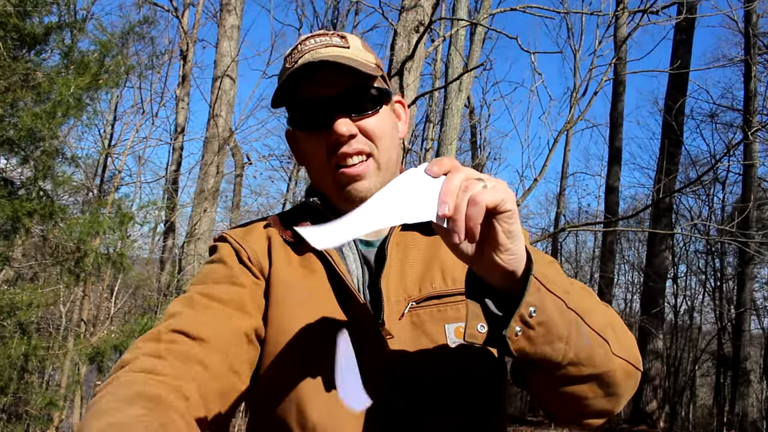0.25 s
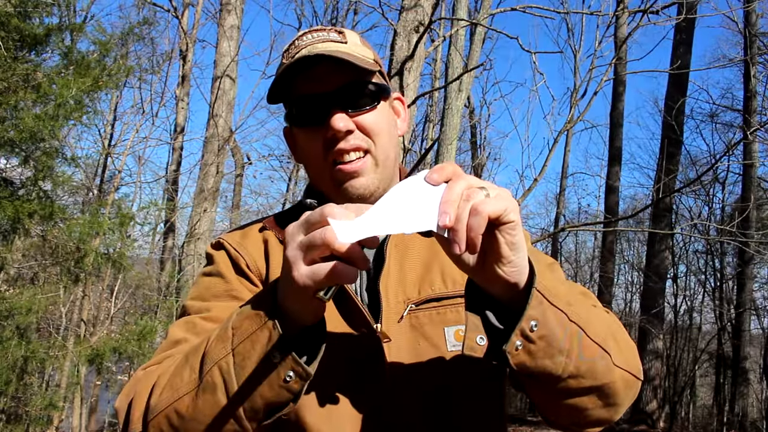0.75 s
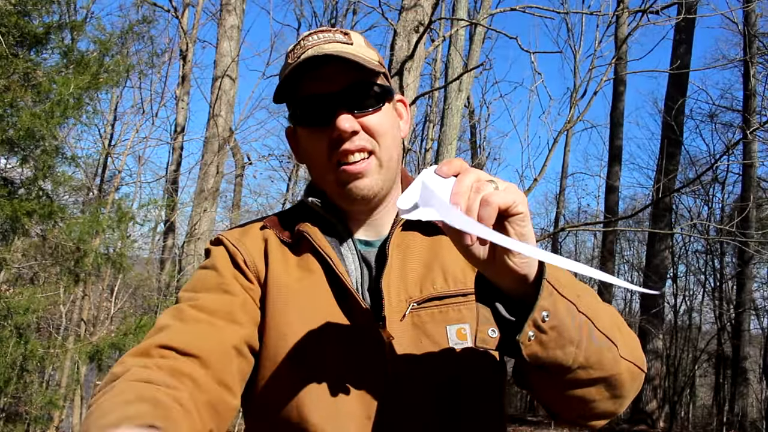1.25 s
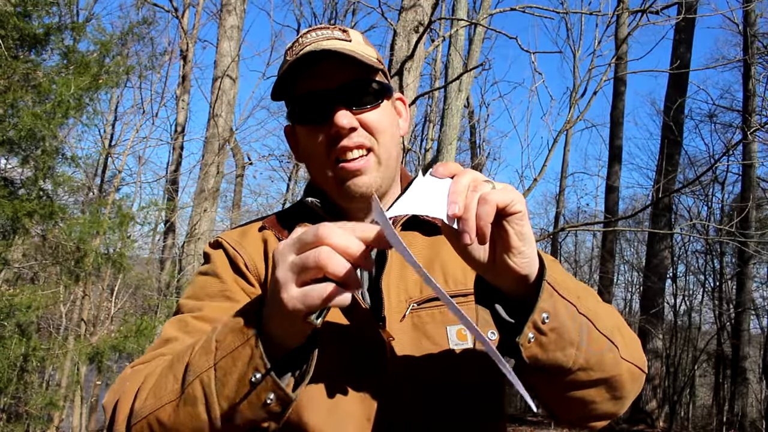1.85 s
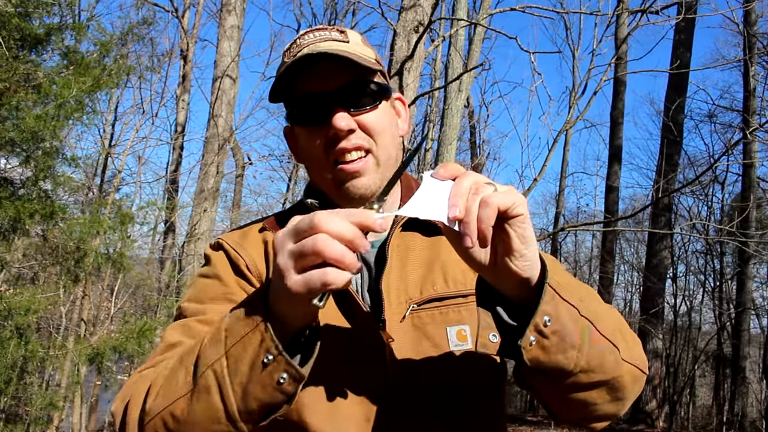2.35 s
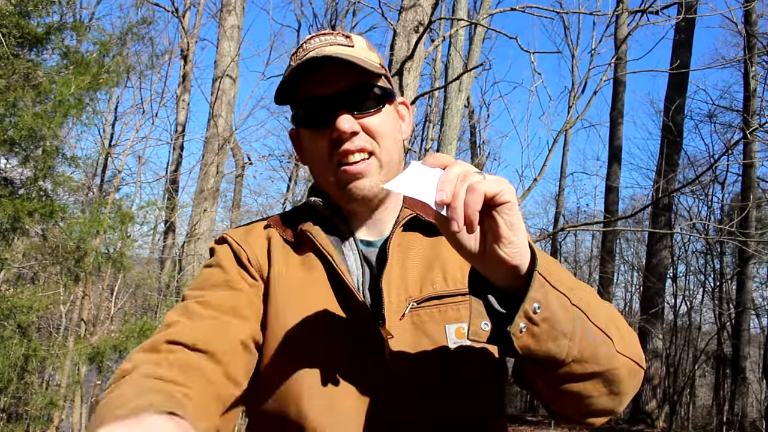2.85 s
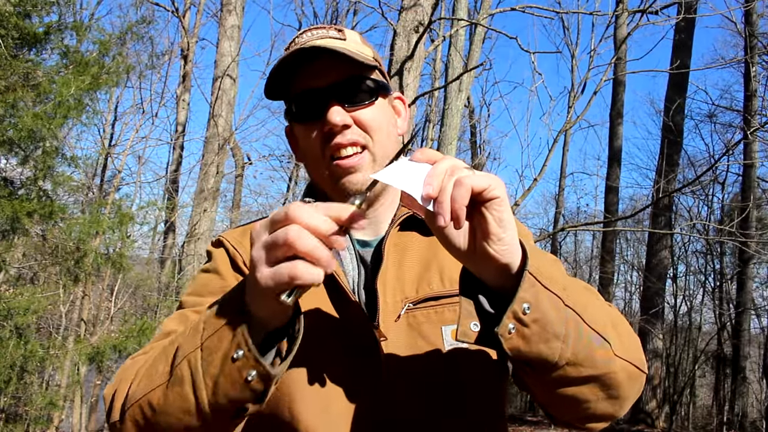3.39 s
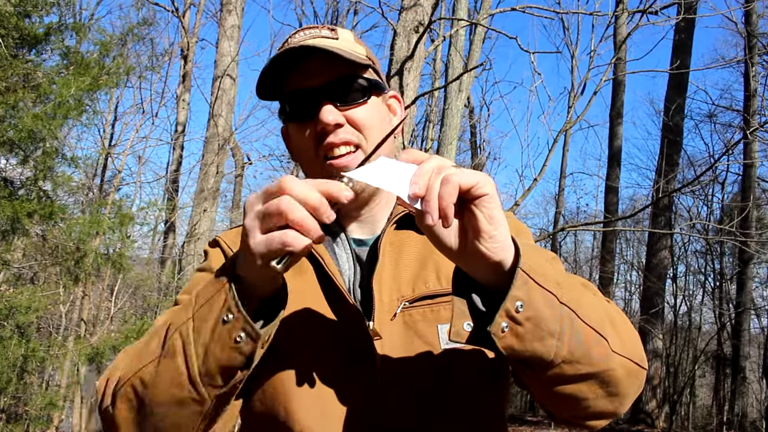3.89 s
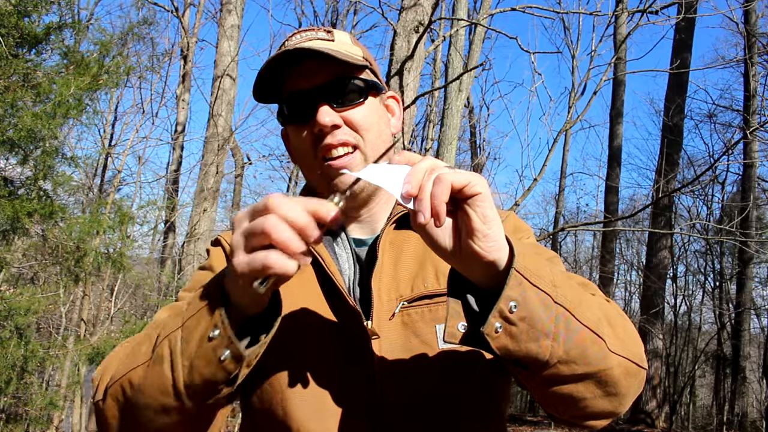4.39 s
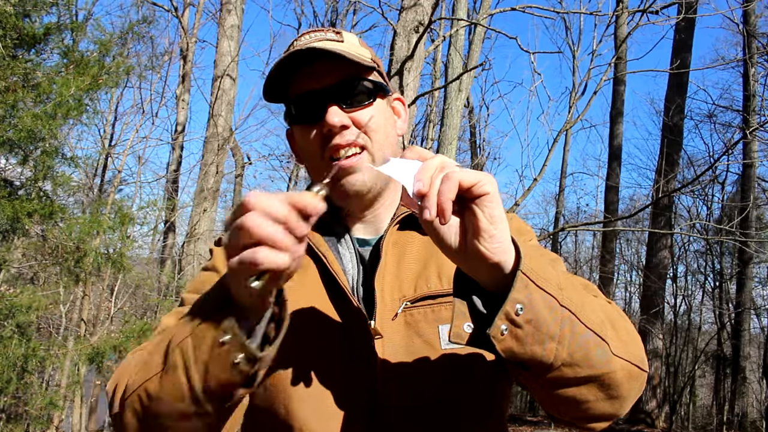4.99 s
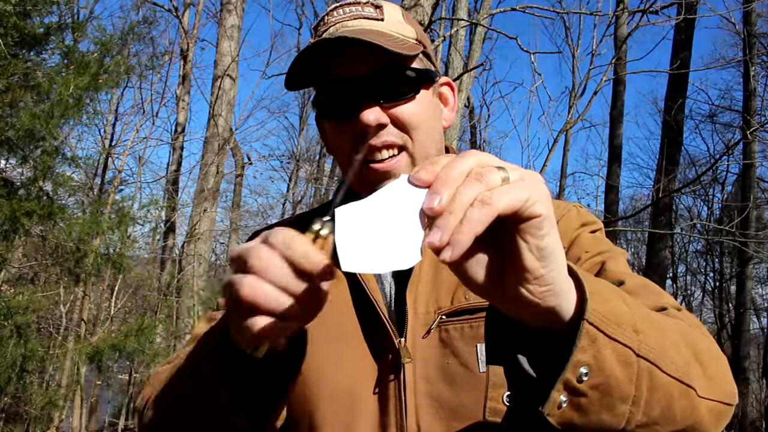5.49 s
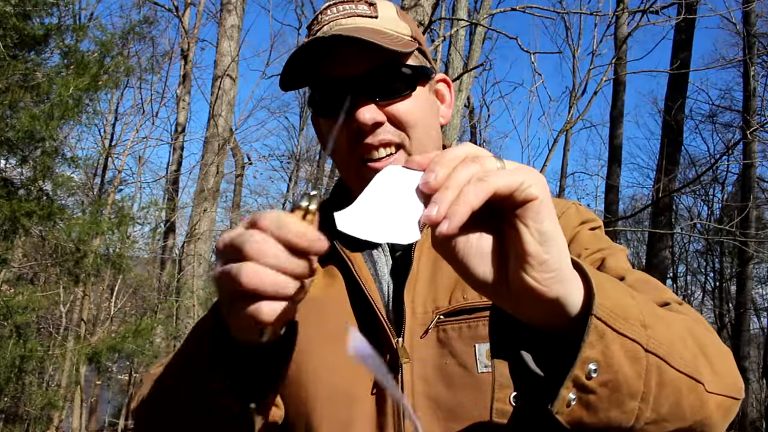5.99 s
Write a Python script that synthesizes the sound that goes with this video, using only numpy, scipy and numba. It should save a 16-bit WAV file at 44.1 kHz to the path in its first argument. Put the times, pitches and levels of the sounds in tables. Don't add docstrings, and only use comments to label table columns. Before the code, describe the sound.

Knife strokes tear crisply through paper close by, spaced out and then quickening into hard popping cuts, over faint breeze and woodland rumble.

```python
import sys
import numpy as np
from scipy import signal
from scipy.fft import rfft, irfft
from scipy.io import wavfile
from scipy.ndimage import uniform_filter1d
from numba import njit

SR = 44100
rng = np.random.default_rng(int(sys.argv[2]) if len(sys.argv) > 2 else 0)


def gain_from_db(level_db):
    decades = np.asarray(level_db, float) / 20
    return 10 ** decades


def put_to_file(sound):
    columns = np.atleast_2d(sound).T
    safe = np.clip(columns, -1, 1)
    whole_steps = np.round(safe * 32767)
    wavfile.write(sys.argv[1], SR, whole_steps.astype(np.int16))


N = 275184

# t/s, peak level/dB, low mode f/Hz, high mode f/Hz, thump level/dB
CHOP_BLOWS = [
    (5.158, -1, 1630, 3120, -37),
    (5.402, -0.5, 2810, 3200, -39),
    (5.639, 2.5, 2110, 2990, -42),
    (5.89, -1, 1840, 2840, -17.5),
    (6.136, -1, 1900, 3170, -11),
]


def unit(x):
    return x / np.sqrt(np.mean(x ** 2))


@njit
def svf(x, hz, q):
    y, b, l, k = np.empty(len(x)), 0., 0., 1 / q
    for i in range(len(x)):
        g = np.tan(np.pi * hz[i] / SR)
        v = (b + g * (x[i] - l)) / (1 + g * (g + k))
        b, l, y[i] = 2 * v - b, l + 2 * g * v, k * v
    return y


def band(x, hz, q):
    centre = np.clip(hz + np.zeros(len(x)), 20, .45 * SR)
    return svf(x, centre, float(q))


def ring(x, hz, q):
    return unit(band(band(x, hz, q), hz, q))


@njit
def follow(x, attack, release):
    y, e = np.empty(len(x)), 0.
    for i in range(len(x)):
        e += (x[i] - e) * (attack if x[i] > e else release)
        y[i] = e
    return y


def walk(rate):
    k = int(SR / rate)
    held = np.repeat(rng.standard_normal(N // k + 1), k)
    return 0.78 * uniform_filter1d(uniform_filter1d(held, k), k)[:N]


def add(out, t, x):
    i = int(t * SR)
    out[i:i + len(x)] += x[:len(out) - i]


def wood():
    # f/Hz, level/dB
    spectrum = [(100, -1), (170, 0), (690, -9), (1200, -15.5), (1700, -19.5), (2750, -20.5), (3270, -18),
                (3800, -24), (4300, -27), (5300, -32), (6400, -35), (9000, -38), (12000, -39.5),
                (16000, -41)]
    hz0, db0 = np.transpose(spectrum)
    hz = np.maximum(np.arange(N // 2 + 1) * SR / N, 1)
    colour = gain_from_db(np.interp(np.log(hz), np.log(hz0), db0)) * np.minimum(hz / hz0[0], 1) ** 2
    noise = rfft(rng.standard_normal(N)) * colour
    out, swell = 0, walk(0.16)
    for k in range(8):
        octave = np.clip(np.log2(hz / 125), 0, 7)
        share = np.clip(1 - np.abs(octave - k), 0, 1)
        out = out + gain_from_db(.5 * swell + .9 * walk(8)) * irfft(noise * share, N)
    return unit(out) * gain_from_db(-35)


def wind():
    # t/s, gust level/dB
    gusts = [(0.0, -24.5), (0.07, -26), (0.1, -35.5), (0.38, -28), (0.42, -36.5), (0.85, -27), (0.97, -32),
             (1.04, -28), (1.22, -51), (1.27, -39), (1.86, -35.5), (2.07, -58), (2.1, -39), (3.56, -48),
             (3.63, -33.5), (3.68, -36.5), (5.51, -53.5), (6.24, -49)]
    gust = np.interp(np.arange(N) / SR, *np.transpose(gusts)) + 35
    buffet = ring(rng.standard_normal(N), 70.3, 0.7) * gain_from_db(0.96 * walk(7.6))
    rumble = ring(rng.standard_normal(N), 148, 0.47) * gain_from_db(1.3 * walk(5.74))
    return buffet * gain_from_db(1.46 * gust - 36.0) + rumble * gain_from_db(0.21 * gust - 33 - 6.5)


def bird():
    # t/s, f/Hz, level/dB
    calls = [
        [(2.33, 8280, -70), (2.365, 7920, -65), (2.45, 7850, -67), (2.5, 7800, -71), (2.58, 7680, -68)],
        [(3.098, 5670, -58), (3.102, 5200, -41), (3.106, 4800, -58)],
    ]
    out = np.zeros(N)
    for call in calls:
        s, hz, db = np.transpose(call)
        t = np.arange(s[0], s[-1], 1 / SR)
        tone = np.sin(2 * np.pi * np.cumsum(np.interp(t, s, hz)) / SR)
        level = np.sqrt(2) * gain_from_db(np.interp(t, s, db))
        add(out, s[0], level * tone * signal.windows.tukey(len(t), .3))
    return out * gain_from_db(5.5 * walk(300) + 2.5 * walk(40))


def ticks():
    # t/s, mid peak level/dB, mid f/Hz, treble level/dB, pushed air level/dB
    tears = [
        (1.162, -0.5, 3500, 7, -20),
        (2.007, -6, 3680, -4, -24),
        (2.8213, -5, 2000, -2, -8),
        (3.501, -0.5, 3300, -25, -18),
        (3.516, -12.5, 3010, -2, -16),
        (4.0734, -1, 4060, -14, -12),
        (4.509, -2.5, 3400, 3.5, -14),
        (4.5192, -10, 3380, -10, -14),
        (4.8699, -1, 1560, 8, -16),
        (5.4228, 1, 2800, -2, -18),
    ]
    # t/s, mid peak level/dB, mid f/Hz, treble level/dB
    flaps = [(0.2348, -19, 1380, -40), (0.3724, -19.5, 1520, -24), (0.8949, -22, 1000, -15),
             (1.198, -21, 3120, -24), (1.2089, -15.5, 2810, -35), (1.2456, -21, 1340, -27),
             (1.7412, -15, 3300, -10), (2.667, -21, 3560, -8), (2.8616, -13.5, 1500, -35),
             (2.877, -22.5, 1310, -26), (3.5314, -20, 2170, -31), (4.5382, -11, 1550, -7),
             (4.905, -23, 3150, -8), (5.933, -18, 1550, -3), (5.957, -25, 1500, -30),
             (6.2036, -15, 3000, -22)]
    # t/s, mid peak level/dB, treble level/dB
    creases = [(0.2924, -40, 3), (1.5683, -26.5, -16), (1.681, -23.5, -11), (2.06, -30.5, -3),
               (2.5704, -35, 1), (2.5864, -29, -7), (2.603, -34, -17), (2.9294, -32, -30),
               (3.595, -26.5, -11), (3.639, -25.5, -11), (4.146, -25, -11), (4.1886, -33, -3),
               (4.2104, -30, -11), (4.5816, -27, -7), (4.624, -28.5, -7), (4.94, -28, 1), (4.9556, -26, -1),
               (5.775, -39.5, 3), (5.8096, -34, 10), (5.8324, -37, 3), (5.862, -40, 0)]
    rows = [(*r[:4], 0.014, r[4]) for r in tears]
    rows += [(*r, 0.032, -12) for r in flaps]
    rows += [(s, db, 1500, treble_db, 0.023, -np.inf) for s, db, treble_db in creases]
    out, t = np.zeros(N), np.arange(int(.06 * SR)) / SR
    for s, db, hz, treble_db, t60, low_db in rows:
        fall = np.exp(-np.log(1000) * t / max(t60, .004))
        dull, port, bright, low = rng.standard_normal((4, len(t)))
        dull = ring(band(dull, hz, 1), hz, 1) + .5 * ring(band(port, 3300, 2), 3300, 2)
        bright = ring(bright, 9000, .8) * fall ** .8
        burst = dull + gain_from_db(treble_db + 4.0) * bright
        add(out, s, gain_from_db(db - 6) * (1 - np.exp(-t / 0.001)) * fall * burst)
        push = (1 - np.exp(-t / 0.0022)) * fall ** 0.61 * ring(low, 520, 0.65)
        add(out, s, gain_from_db(db + low_db) * push)
    return out


def blows():
    out, t = np.zeros(N), np.arange(int(.03 * SR)) / SR
    for s, db, low_hz, high_hz, thump_db in CHOP_BLOWS:
        modes = np.sin(2 * np.pi * low_hz * t * (1 + 12 * t)) * np.exp(-t / 0.0016)
        modes += 0.54 * np.sin(2 * np.pi * high_hz * t) * np.exp(-t / 0.0013)
        modes += 0.15 * np.sin(2 * np.pi * 0.65 * low_hz * t) * np.exp(-t / 0.0027)
        crack = 0.21 * ring(rng.standard_normal(len(t)), 4700, 0.31) * np.exp(-t / 0.0018)
        thump = gain_from_db(thump_db) * np.sin(2 * np.pi * 450 * t) * np.exp(-t / 0.0033)
        add(out, s, gain_from_db(db - 1.5) * (modes + crack + thump))
    return out


def snaps():
    snaps_per_s, spread_db, most = 12000, 2.8, 4.2
    hit = rng.random(N) < snaps_per_s / SR
    size_db = spread_db * np.minimum(rng.exponential(size=N), most)
    return hit * gain_from_db(size_db) * rng.choice([-1, 1], N) * gain_from_db(1.7 * walk(250))


def stroke_db(t, row, drop_db, release_db_s):
    s, attack, hold, db, change = row
    drop_s, bite_db = 0.0035, -20
    top = s + max(attack, 1e-4)
    end = top + max(hold, 1e-3)
    times = [s - 1e-4, s, top, end, end + drop_s]
    levels = [-120, db + bite_db, db, db + change, db + change + drop_db]
    return np.interp(t, times, levels) - release_db_s * np.maximum(t - end - drop_s, 0)


def edge_hiss(hiss, edge_hz):
    wide = ring(hiss, 8300, 0.39)
    edge = wide + 0.85 * unit(band(wide, edge_hz, 1.8))
    for hz in (5530, 6740, 8020, 10260, 11570):
        edge += .3 * gain_from_db(4.5 * walk(45)) * ring(hiss, hz * (1 + .05 * walk(30)), 7.)
    return unit(edge)


def cutting():
    # blade bites t/s, attack/s, hold/s, level/dB, change over the hold/dB
    draws = [
        (-.012, 0.022, 0.184, -17.5, -1),
        (.975, 0.018, 0.17, -21, 1.5),
        (1.869, 0.033, .11, -18.5, 0.5),
        (2.692, 0.028, 0.103, -21.5, 4.5),
        (3.446, 0.017, 0.0384, -16.5, 2.5),
        (4.022, 0.012, 0.044, -22.5, 5.5),
        (4.441, 0.024, 0.047, -19.5, 0),
        (4.81, 0.0084, 0.058, -19.5, -1.5),
    ]
    # hold/s, level/dB, change over the hold/dB, first-bite excess/dB
    chop_holds = [
        (.059, -21, 0, 13.5),
        (0.027, -21, -5.5, 6),
        (0.044, -18, -2.5, 3),
        (0.039, -19, -7, 4),
        (0.056, -20, -6, 8),
    ]
    grazes = [(.191, .002, 0.0095, -28, -10), (.892, .004, 0.1, -28.5, -2), (1.164, .003, 0.014, -22, -5.5),
              (1.204, .006, 0.012, -46, -5), (1.798, 0.0074, 0.092, -37, 17),
              (2.575, 0.031, 0.034, -39.5, 6.5), (2.654, 0.012, 0.022, -32.5, -6),
              (2.82, .003, .008, -26, -6), (3.398, 0.0072, .047, -46.5, 8), (3.502, .002, 0.012, -24.5, -7),
              (4.515, .004, .006, -27, -5), (4.877, .003, 0.01, -40, -7), (5.426, .002, .012, -35, -4),
              (5.439, 0.0066, 0.0095, -20, 3), (5.459, .002, 0.01, -39, -14),
              (5.688, .004, 0.012, -41, -11), (5.93, .003, 0.017, -46, -18),
              (6.197, 0.005, 0.0039, -29, -3)]
    # first, second, third mode f/Hz, first, second ring level/dB
    strips = [(1730, 2680, 3400, -18, -5), (1437, 2510, 3190, 3, -3.5), (1470, 2500, 3340, -2.5, -5.5),
              (1530, 2720, 3560, -2, -4), (2030, 2700, 3270, -2, -14), (1500, 2630, 3320, -19, -1),
              (1460, 2560, 3300, -18, -7), (2060, 2920, 3510, 0.5, -3.5), (1270, 2250, 3030, -8, -3.5),
              (1860, 2700, 3000, -28, -2.5), (1400, 2570, 3160, -7, -5), (1760, 3020, 3200, -4, 0),
              (1210, 2270, 3050, -6, 5)]
    # belly, edge, air level/dB, edge hiss centre f/Hz, brightening to the end/dB
    colours = [(-15, -3.5, -21, 7000, -2), (-12, -4.5, -23, 9300, 3), (-14.5, -5.5, -9, 9200, 0.5),
               (-13, -5.5, -12, 10000, -1), (-14.5, -3.5, -19, 8300, -9.5), (-12.5, 1, -5, 5600, -2),
               (-13, -1.5, -7, 8900, 0), (-8, -3.5, -10, 9600, 9), (-13, -6, -12, 8800, 2),
               (-8, -3, -9, 8400, 0), (-11, -6.5, -10, 9400, 7), (-3.5, -2, -6.5, 25000, 5),
               (-3.5, -7.5, -12, 7600, 8)]
    # modes/octave, hiss/octave, air level/dB, extra hiss midway level/dB
    bends = [(0.063, 0.39, 3, 1.5), (0.12, 0.11, 6, 5.5), (-0.016, 0.42, 1, 2.5), (.08, -0.89, -1, 5.5),
             (0.035, -0.35, -9, 1.5), (-0.017, -.1, 2, 2.5), (-0.019, -0.64, -8, 2), (0, .15, 0, 3),
             (-0.13, -0.11, 2, -0.5), (0, -0.2, -9, 1), (-0.0043, -0.055, 4, 2.5), (0, .05, -7, 2.5),
             (-0.038, 0, -2, 4.5)]
    # first, second ring, belly level/dB, broad mode/octave
    changes = [
        (-5, -3.5, 2, 0.37),
        (-13, 3.5, 1.5, 0),
    ]
    # belly, edge, air level/dB per dB under the stroke
    dulling = [
        (.6, -0.35, -1.1),
        (.7, -0.46, -0.6),
    ]

    t = np.arange(N) / SR
    chops = [(blow[0], 0, *row[:3]) for blow, row in zip(CHOP_BLOWS, chop_holds)]
    # quick drop in dB, then fall in dB/s
    kinds = ((draws, -18, 1405), (chops, -22, 1300), (grazes, -17, 1500))
    envelopes = [stroke_db(t, row, drop, fall) for rows, drop, fall in kinds for row in rows]
    sheet_db = np.max(envelopes, axis=0)

    s, attack, hold, db, change = np.transpose(draws + chops)
    which = np.searchsorted(s[1:] - .13, t)
    chop = (which >= len(draws)).astype(int)
    length = (attack + hold)[which]
    along = np.clip((t - s[which]) / length, -.5, 1)
    in_stroke = np.clip(along, 0, 1)
    past_middle = np.maximum(along, 0) - .5
    under = np.clip(db[which] + change[which] * in_stroke - sheet_db, 0, 30)
    for blow, row in zip(CHOP_BLOWS, chop_holds):
        sheet_db += row[3] * (t >= blow[0]) * np.exp(-np.abs(t - blow[0]) / 0.011)

    colour, strip, bend = (np.transpose(table)[:, which] for table in (colours, strips, bends))
    modes_up, hiss_up, air_up = bend[:3] * past_middle
    letting_go = (along > .5).astype(int)
    belly_db, edge_db, air_db = colour[:3] + np.transpose(dulling)[:, letting_go] * under
    first_up, second_up, belly_up, broad_up = np.transpose(changes)[:, chop] * (along - .5)
    bright = colour[4] * (along - .5) + bend[3] * np.sin(np.pi * in_stroke)
    belly_db = belly_db + belly_up
    edge_db = edge_db + bright
    air_db = air_db + bright + air_up
    edge_hz, mode_hz = colour[3] * 2 ** hiss_up, strip[:3] * 2 ** modes_up
    first_db = strip[3] + first_up - 50 * length * past_middle
    second_db = strip[4] + second_up

    crackle = snaps()
    first, second, third = (ring(crackle, hz * (1 + .03 * walk(70)), q) * gain_from_db(2.2 * walk(90))
                            for hz, q in zip(mode_hz, (5., 6., 5.5)))
    belly = ring(crackle, 1780, 0.67) + 0.91 * unit(band(crackle, 970, 0.79))
    belly = (belly + gain_from_db(first_db) * first) / np.hypot(1, gain_from_db(first_db))
    broad = ring(snaps(), 3900 * 2 ** broad_up * (1 + 0.21 * walk(40)), 0.98)
    sheet = third - gain_from_db(second_db) * second + 0.95 * broad
    hiss = snaps()
    edge = edge_hiss(hiss, edge_hz)
    air = ring(hiss, 14200, 1.34)
    layers = unit(sheet) + belly * gain_from_db(belly_db) + edge * gain_from_db(edge_db) - air * gain_from_db(air_db)
    return gain_from_db(sheet_db + 1.6 * walk(70)) * layers


def scene():
    attack_s, release_s, duck_db = 0.032, 0.068, -9
    near = cutting() + blows() + ticks()
    loud = follow(np.abs(near), 1 / (attack_s * SR), 1 / (release_s * SR))
    duck = gain_from_db(duck_db * np.clip(loud / 0.21, 0, 1.5))
    return (near + duck * (wood() + wind() + bird()))[None]


def band_limit(x):
    return signal.sosfilt(signal.butter(12, 16500, fs=SR, output="sos"), x)


def record(dry):
    top_cut = signal.ellip(10, .2, 70, 15900, fs=SR, output="sos")
    mix = np.clip(signal.sosfilt(top_cut, dry), -1, 1)
    return band_limit(mix)


dry = scene()
out = record(dry)
put_to_file(out)
```